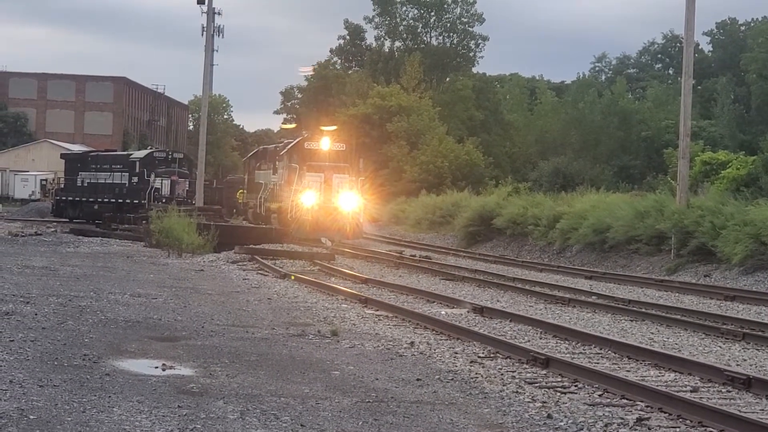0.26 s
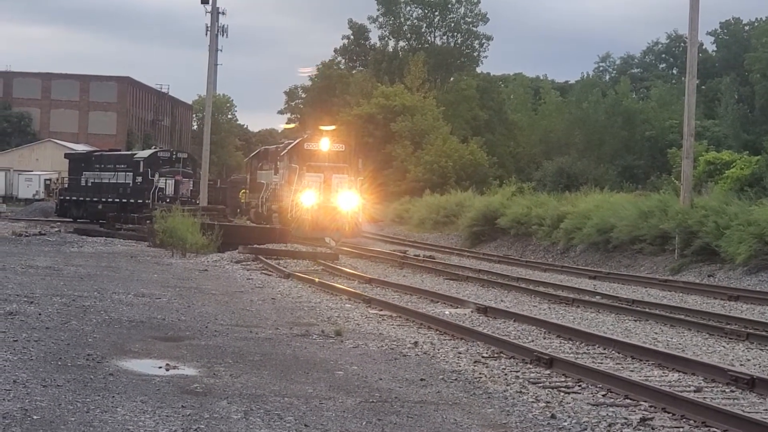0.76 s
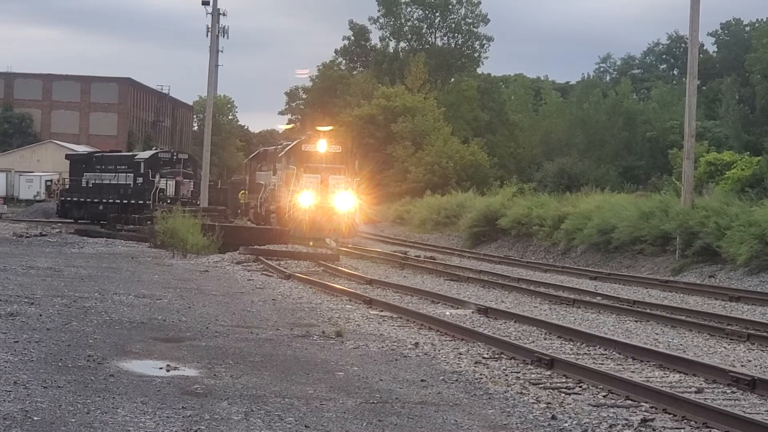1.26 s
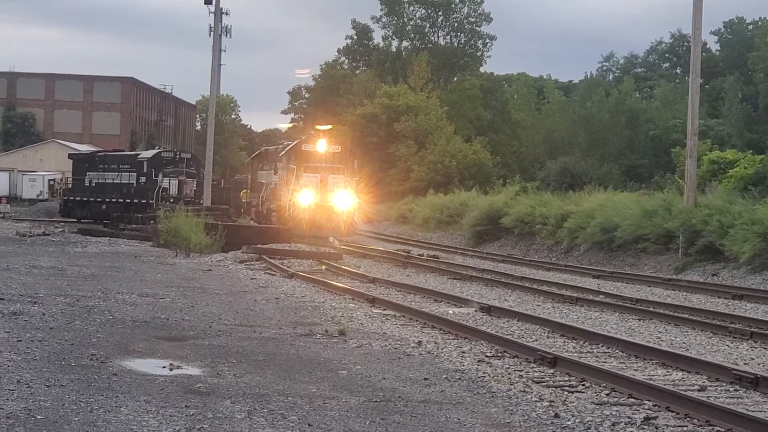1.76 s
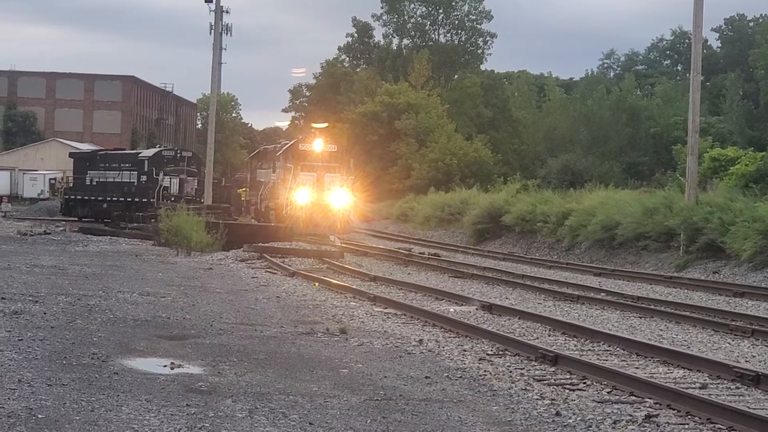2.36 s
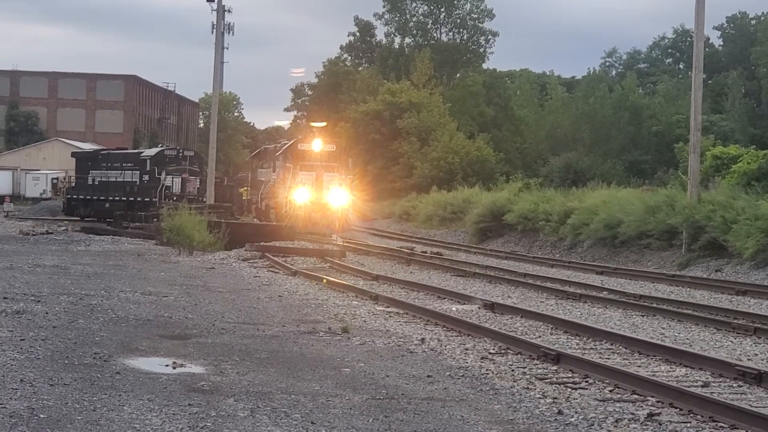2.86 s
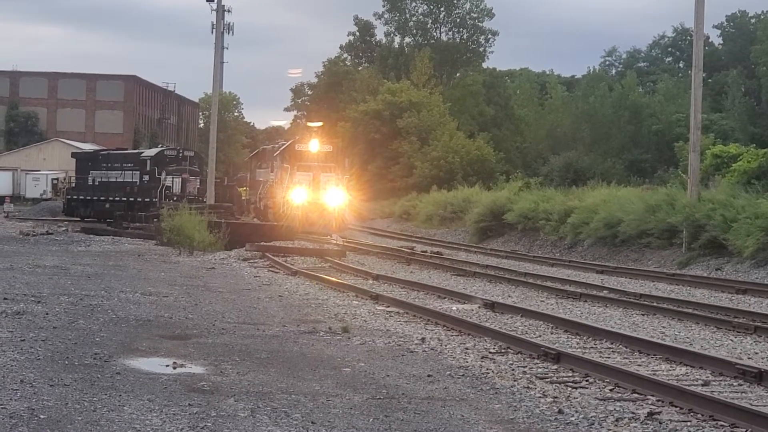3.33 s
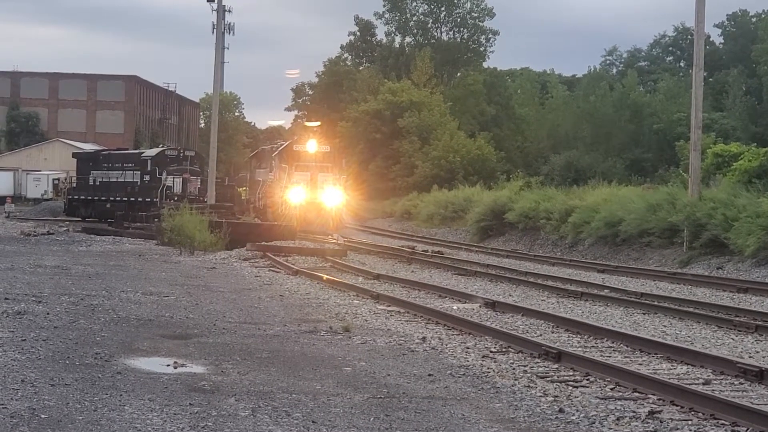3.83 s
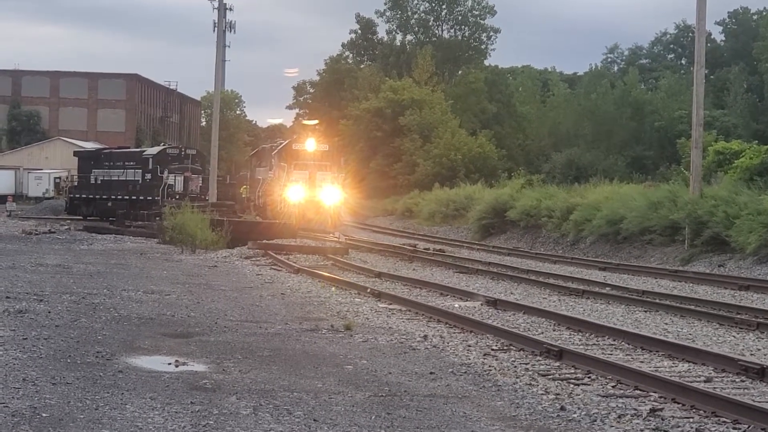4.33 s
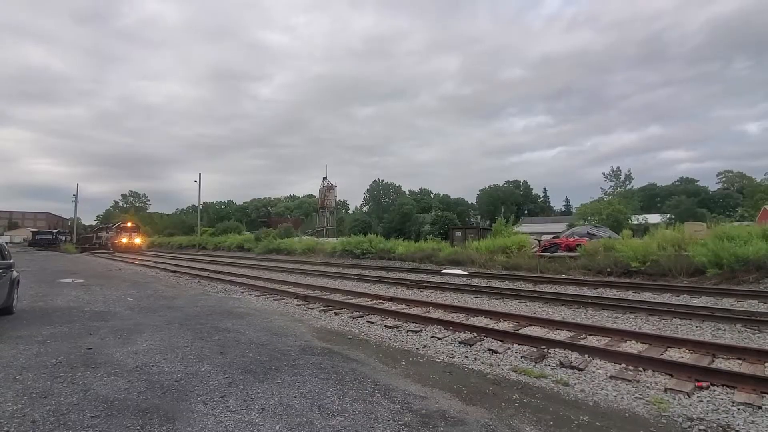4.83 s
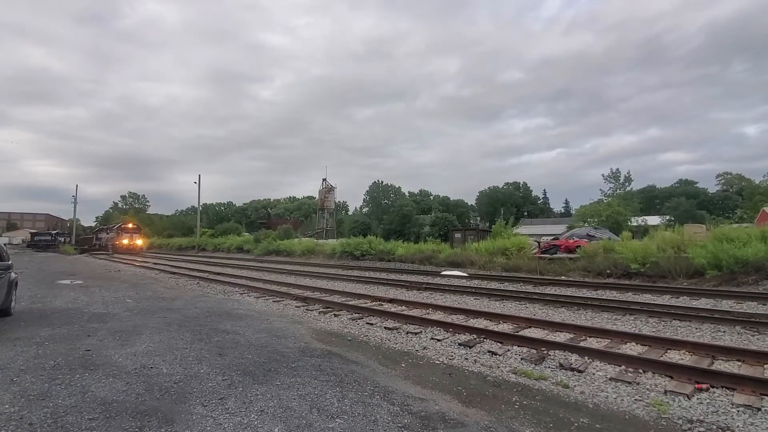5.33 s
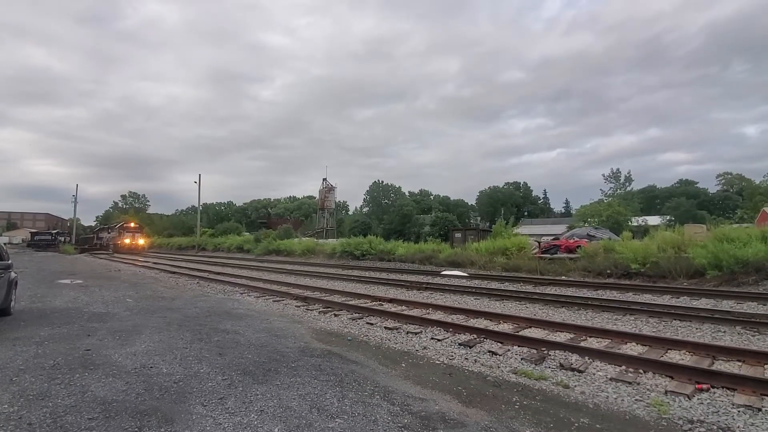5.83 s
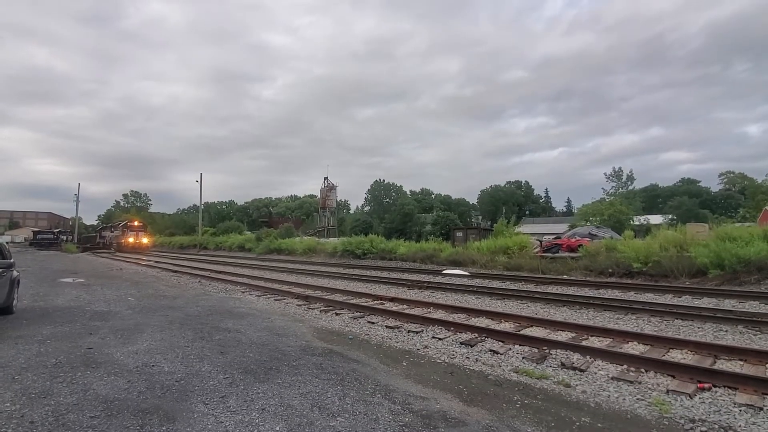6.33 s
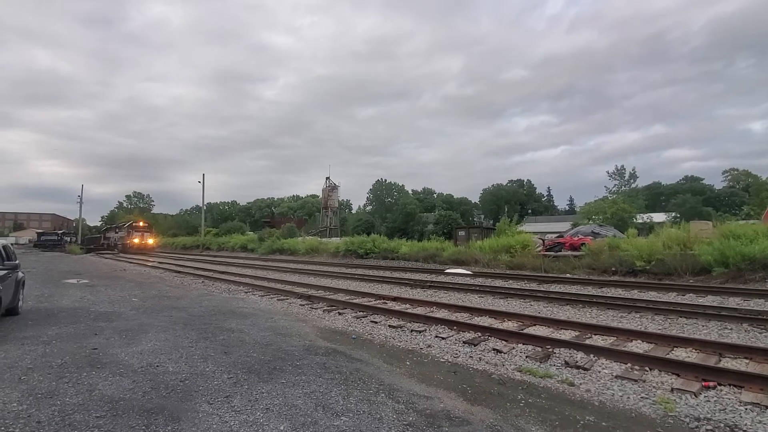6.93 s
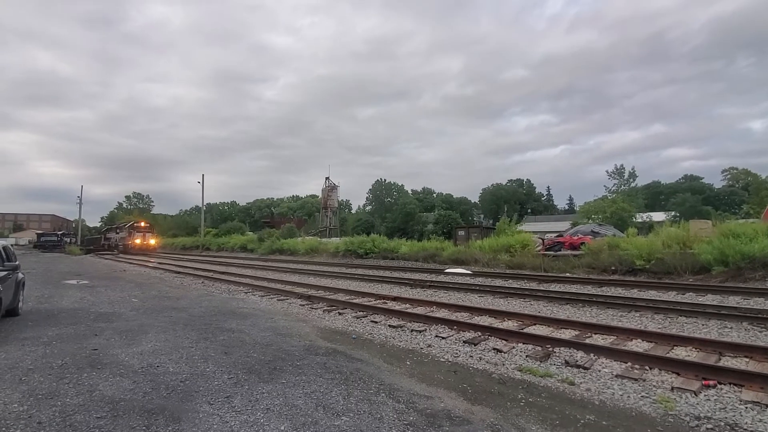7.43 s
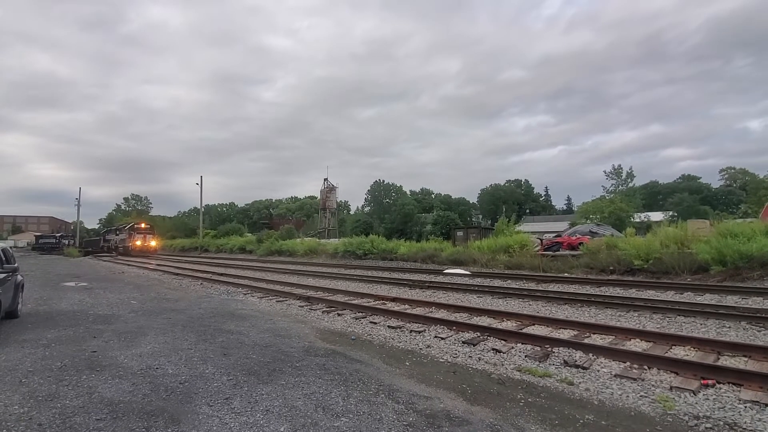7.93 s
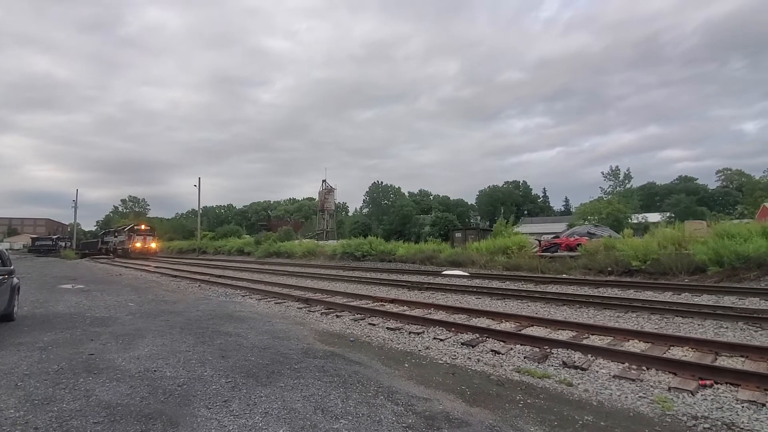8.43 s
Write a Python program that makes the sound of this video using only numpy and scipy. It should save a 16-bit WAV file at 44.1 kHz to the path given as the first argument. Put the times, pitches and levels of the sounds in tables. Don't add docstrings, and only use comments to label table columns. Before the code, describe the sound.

Outdoors in a rail yard, a handheld phone picks up a big diesel locomotive idling in a deep, wavering drone. Insects rasp in the weeds over a soft hiss. Near one second a coupler thuds with thin brake squeals, followed by a sharp air puff. After a blunt handling knock, the sound cuts at about 4.7 seconds to a louder, rougher engine, with small knocks and crisp gravel cracks.

```python
import sys
import numpy as np
from scipy import signal
from scipy.fft import rfft, irfft, next_fast_len
from scipy.io import wavfile
from scipy.ndimage import uniform_filter1d

SR = 44100
rng = np.random.default_rng(int(sys.argv[2]) if len(sys.argv) > 2 else 0)


def undo_db(level):
    steps = np.asarray(level, float) / 20
    return 10 ** steps


def pcm_store(signal):
    levels = np.round(np.clip(np.atleast_2d(signal), -1, 1) * 32767)
    wavfile.write(sys.argv[1], SR, levels.astype(np.int16).T)


N = 382788
T = np.arange(N) / SR
SIZE = next_fast_len(N)
HZ = np.arange(SIZE // 2 + 1) * SR / SIZE + 1e-3
EARS = np.array([[1], [-1]]) / 2
CUT_S = 4.73399

# hz, left_db_per_hz, right_db_per_hz
YARD_HISS = [
    [(2400, -104, -109), (2700, -108, -110), (3300, -107, -109), (3900, -109, -110), (4520, -107, -108), (4870, -100, -103), (6070, -101, -118), (6630, -114, -112), (7160, -116, -115), (9580, -101, -102), (10440, -105, -92.5), (12400, -114, -105), (15500, -120, -112), (15200, -121, -136), (15800, -125, -138)],
    [(2650, -101, -105), (3500, -96.5, -107), (3800, -102, -103), (4140, -97.5, -96.5), (4550, -102, -102), (5420, -102, -102), (5900, -105, -119), (6750, -112, -118), (7750, -118, -121), (8130, -106, -119), (8460, -102, -119), (9000, -98.5, -109), (10000, -103, -104), (11270, -102, -95), (12500, -110, -96), (13300, -115, -101), (14300, -118, -100), (15600, -120, -106), (15800, -125, -115)],
]
# time_s, level_db
FAR_CHORUS = [(0, 3.5), (.7, 1), (1.3, 0.5), (2.3, 0.5), (2.6, 4), (4.5, 2.5), (4.72, 1)]


def along(table):
    rows = np.array(table)
    return [np.interp(T, rows[:, 0], column) for column in rows.T[1:]]


def over_hz(table):
    rows = np.array(table)
    return np.array([np.interp(np.log(HZ), np.log(rows[:, 0]), column) for column in rows.T[1:]])


def filtered(x, gain):
    return irfft(rfft(x, SIZE) * gain, SIZE)[..., :N]


def above(hz, steep):
    return 1 / (1 + (hz / HZ) ** steep)


def walk(rate_hz):
    hold = int(SR / rate_hz)
    held = np.repeat(rng.standard_normal(N // hold + 1), hold)
    return 1.255 * uniform_filter1d(uniform_filter1d(held, hold), hold)[:N]


def humps(table):
    return sum(db * np.clip(1 - np.abs(T - s) / half, 0, 1) for s, half, db in table)


def ports(stand):
    # hz, share
    alike = [(150, 1), (300, 0.93), (450, 0.89), (700, 0.83), (1000, 0.62), (2000, 0.5), (4000, 0.28),
             (8000, 0.3), (12000, 0.26)]
    # hz, lead_rad
    lead = [
        [(0, 0), (100, -.1), (520, .6), (750, .3), (1400, 2.1), (2000, 2.), (3200, 8.8), (16000, 45)],
        [(0, 0), (100, 0), (350, .5), (450, 1.9), (620, .8), (800, 1.1), (900, 1.9), (2200, 6.3), (4800, 15.3), (16000, 44)],
    ]
    shared, left, right = rfft(rng.standard_normal((3, SIZE)))
    like = np.clip(over_hz(alike)[0], 0, 1)
    late = shared * np.exp(-1j * np.interp(HZ, *np.transpose(lead[stand])))
    return np.sqrt(like) * np.array([shared, late]) + np.sqrt(1 - like) * np.array([left, right])


def banded(noise, edges_hz, levels_db, colour):
    steps = [1] + [above(hz, 2.3 + hz / 500) for hz in edges_hz] + [0]
    bands = 0
    for db, lower, upper in zip(levels_db, steps, steps[1:]):
        bands = bands + undo_db(db) * irfft(noise * (lower - upper), SIZE)[:, :N]
    return filtered(bands, undo_db(over_hz(colour)) * np.sqrt(SR / 2))


def strokes():
    # start_s, peak_db
    wing_strokes = [(0.0902, -54), (0.1471, -51), (0.1955, -55), (0.2433, -47), (0.2862, -50),
                    (0.3287, -56), (0.3755, -52), (0.5222, -44), (0.5621, -48), (0.6325, -49),
                    (0.9093, -53), (1.3882, -50), (1.4277, -45.5), (1.5723, -52), (1.9405, -58),
                    (1.9874, -52), (2.2009, -58), (2.3526, -52), (2.3979, -47.5), (2.4364, -51),
                    (2.4763, -55), (2.5142, -53), (2.5601, -52), (2.6095, -46), (2.6584, -47),
                    (2.6988, -42.5), (2.8569, -51), (2.9542, -53), (3.0021, -45.5), (3.041, -49),
                    (3.0804, -48), (3.1288, -50), (3.2186, -52), (3.269, -51), (3.3258, -53),
                    (3.3737, -48.5), (3.4077, -49), (3.461, -47), (3.4974, -54), (3.5458, -53),
                    (3.5957, -54), (3.6441, -50), (3.697, -46), (3.7434, -44), (3.7818, -48), (3.8511, -48),
                    (3.897, -50), (3.9404, -54), (3.9898, -51), (4.0342, -48), (4.115, -49), (4.1584, -52),
                    (4.3056, -49), (4.3829, -51), (4.4662, -54), (4.5121, -55), (4.5605, -48),
                    (4.6084, -53), (4.6438, -48.5), (4.6843, -52)]
    stroke_s = 0.044
    when_s, size_db = np.transpose(wing_strokes)
    steady_s = np.arange(0, CUT_S, stroke_s)
    gap_s = np.abs(steady_s[:, None] - when_s).min(axis=1)
    lull_s = steady_s[gap_s > 0.8 * stroke_s]
    at = (when_s * SR).astype(int)
    hits = np.zeros(N)
    hits[(lull_s * SR).astype(int)] = undo_db(-60 + 61.0)
    hits[at] = undo_db(size_db - along(FAR_CHORUS)[0][at] + 57.5)
    t = T[:SR // 10]
    return signal.fftconvolve(hits, (1 - np.exp(-t / 0.0016)) * np.exp(-t / 0.017))[:N]


def yard(stand):
    # centre_s, half_length_s, lift_db
    gusts = [
        (1.043, 0.23, 6.5),
        (4.43, 0.34, 4.5),
        (6.17, 0.35, 2.5),
        (6.717, 0.25, 4.5),
        (7.96, 0.23, 4.5),
        (4.95, .4, -3),
        (8.62, 0.15, 2.5),
    ]
    top_share = 0.37
    gust_db = humps(gusts)
    if stand == 0:
        chorus_db = along(FAR_CHORUS)[0]
        settle_db = -0.32 * (T - 3.0)
        rasp = strokes()
        treble_share = top_share
    else:
        chorus_db = 1.5 * (T - 5.2)
        settle_db = -0.3
        rasp = 0.45 * undo_db(3.5 * walk(40))
        treble_share = 1.1
    middle_db = gust_db + settle_db
    high_db = chorus_db + 0.43 * gust_db

    def rasp_db(share):
        return 10 * np.log10(0.5 + (share * rasp) ** 2)

    swell_db = 1.0 * walk(8.4)
    shrill_gate = np.clip((6.8 - T) / 0.5, 0, 1) * np.clip((T - 4.3) / 1.3, 0, 1)
    shrill_db = stand * 5 * (shrill_gate - 0.4)
    flicker_db = 1.3 * walk(17)
    levels_db = (
        middle_db + flicker_db + 1.0 * walk(3.04),
        middle_db - 0.39 * gust_db + 2.15 + rasp_db(1.0),
        high_db + swell_db + rasp_db(1.13),
        treble_share * high_db - stand * 1.5 + swell_db + 0.62 * walk(17) + rasp_db(0.28),
        top_share * high_db + shrill_db + swell_db + 1.5 * walk(17) + rasp_db(0.28))
    hiss = banded(ports(stand), (4670, 8870, 12000, 13100), levels_db, YARD_HISS[stand])
    return filtered(hiss, above(2490, 41))


def jets(table, width_share, pure):
    out = np.zeros((2, N))
    for s, length_s, hz, db, pan_db in table:
        t = T[:int(length_s * SR)]
        low_pass = signal.butter(2, width_share * hz / 2, fs=SR, output="sos")
        slow = signal.sosfilt(low_pass, rng.standard_normal((4, SR // 2)))
        in_phase, quadrature = slow[:2, -len(t):], slow[2:, -len(t):]
        phase = 2 * np.pi * hz * t * (1 + 0.14 * t / 2)
        jet = (in_phase + pure * slow.std()) * np.cos(phase) + quadrature * np.sin(phase)
        jet = jet * undo_db(2.5 * walk(30)[:len(t)])
        shape = np.minimum(t / 0.01, 1) * (1 - t / length_s) ** 0.17
        at = int(s * SR)
        out[:, at:at + len(t)] += undo_db(db + pan_db * EARS) * shape * jet / jet.std()
    return out


def squeals():
    # start_s, length_s, centre_hz, level_db, left_minus_right_db
    brake_squeals = [
        (.923, .25, 4200, -71, -6),
        (.936, .06, 3530, -74, 8),
        (1.051, .11, 3530, -75, 8),
        (.961, .09, 3310, -72, 10),
        (.936, .045, 2510, -71, 11),
        (1.086, .04, 2510, -73, 11),
        (.941, .03, 6060, -75, 0),
        (4.181, .07, 3340, -76, 3),
        (4.276, .125, 3440, -74, 3),
        (4.301, .09, 3090, -80, 8),
    ]
    return jets(brake_squeals, 0.03, 1.0)


def whistles():
    # start_s, length_s, centre_hz, level_db, left_minus_right_db
    valve_whistles = [
        (4.205, .03, 3400, -77, 3),
        (5.970, 0.043, 4170, -75, 2),
        (1.424, .022, 5050, -66, 2),
        (1.380, .02, 4950, -69, 2),
        (8.518, .09, 4100, -66, -2),
        (8.521, 0.04, 4850, -71, -2),
        (8.52, .05, 3450, -72, -2),
        (8.585, .04, 4900, -74, -2),
        (1.09, .07, 5000, -75, 0),
    ]
    return jets(valve_whistles, 0.1, 0)


def puffs():
    # start_s, length_s, centre_hz, level_db, left_minus_right_db
    air_puffs = [(.927, 0.25, 10000, -65, 4), (.928, 0.23, 3800, -75, -1), (4.148, .45, 3300, -76, 3),
                 (1.382, 0.11, 1790, -61.5, 1), (1.422, 0.033, 852, -46.5, -4),
                 (1.423, 0.028, 5150, -65, 0), (5.389, 0.031, 1620, -54, -16),
                 (5.387, 0.037, 3200, -65, -10), (5.388, 0.026, 6500, -71, -13),
                 (6.198, 0.13, 4230, -69, -9), (8.526, 0.083, 4290, -68, 3)]
    return jets(air_puffs, 0.6, 0)


def gravel():
    # start_s, rms_level_db, length_s, left_minus_right_db, lowest_hz
    cracks = [(0.091, -46, 0.0024, 11, 8000), (5.513, -48, 0.013, 2, 8000), (5.667, -55, 0.034, -5, 8000),
              (6.661, -35.5, 0.0034, 3, 8000), (6.666, -48, .005, -5, 9000), (6.636, -49, .02, -7, 10500),
              (6.68, -48, .035, -7, 10500), (7.977, -50, .003, -5, 10000), (6.69, -52, 0.084, -7, 9050),
              (7.225, -56, .008, 0, 9000), (7.267, -38, 0.0056, -7, 13000), (7.276, -41, .007, -7, 12000),
              (7.31, -53, 0.035, 12, 3530), (7.308, -43.5, 0.013, 13, 5000), (7.314, -38, .026, -4, 12800),
              (7.27, -55, 0.048, 10, 4800), (7.308, -44, 0.061, -0.5, 9000), (7.313, -37, .004, -3, 9000),
              (7.324, -44, .006, -2, 11500), (7.331, -37, .005, 1, 9500), (7.336, -44, .004, -3, 8500),
              (7.77, -52, .006, 2, 8000), (7.7925, -29.5, 0.003, -5, 10400), (7.853, -47, .006, 2, 3500),
              (7.872, -57, .03, -5.5, 8000), (7.943, -53, .018, -4, 10000),
              (7.971, -38.5, 0.0038, -3, 2500), (8.197, -54, .006, 0, 8000)]
    out = np.zeros((2, N))
    for s, db, length_s, pan_db, low_hz in cracks:
        n = int(length_s * SR)
        chance = rng.random((2, 4000))[:, :n]
        grains = (chance[0] < 0.012) * undo_db(-4.5 * np.log(chance[1]))
        rough = 1.1 + signal.lfilter([1], [1, -0.96], grains)
        shape = np.sin(np.pi * (np.arange(n) / n) ** 0.39)
        swarm = rng.standard_normal(4000)[:n] * rough * shape
        swarm = signal.sosfilt(signal.butter(4, low_hz, "high", fs=SR, output="sos"), swarm)
        at = int(s * SR)
        out[:, at:at + n] += undo_db(db + pan_db * EARS) * swarm / np.sqrt(np.mean(swarm ** 2))
    port_colour = undo_db(0.75 * (over_hz(YARD_HISS[1]) + 91.5))
    return filtered(out, port_colour * above(1800, 11) * (1 - above(15900, 13)))


def knocks():
    # start_s, ring_hz, t60_s, left_db, right_db
    rings = [(.926, 128, .3, -21, -21), (.942, 95, .22, -24, -24), (.940, 282, .16, -30, -30),
             (.995, 300, .2, -35, -35), (1.428, 830, .1, -42, -42), (1.432, 1600, .08, -54, -54),
             (4.60984, 1085, .0053, -70, -19.7), (4.6098, 2500, .009, -70, -45),
             (4.6098, 1600, .008, -70, -38), (5.392, 1300, .08, -47, -38), (5.397, 1600, .05, -50, -40),
             (5.396, 1850, .06, -50, -41), (5.396, 2150, .04, -54, -45), (5.395, 2450, .03, -60, -50),
             (7.637, 1650, .035, -42, -40)]
    out = np.zeros((2, N))
    t = T[:SR // 3]
    for s, hz, t60_s, left_db, right_db in rings:
        ring = -np.sin(2 * np.pi * hz * t) * np.exp(-np.log(1000) * t / t60_s)
        at = int(s * SR)
        out[:, at:at + len(t)] += undo_db(np.array([[left_db], [right_db]])) * ring
    return out


def finger():
    rest_hz, extra_turns, relax_s = 56.8, 1.006, 0.00173
    t = np.maximum(T - 4.60952, 0)
    closing = 1 - np.exp(-(t / 0.00218) ** 2.53)
    size = closing * (8 * np.exp(-t / 0.00092) + 0.44 * np.exp(-t / 0.0119))
    turns = rest_hz * t + extra_turns * (1 - np.exp(-t / relax_s))
    return np.array([[0], [-1]]) * size * np.sin(2 * np.pi * turns)


def locomotive(stand):
    # multiple, first_stand_db, second_stand_db
    orders = [(7, -57, -50), (8, -44, -36), (9, -44, -43), (11, -47, -42), (12, -46, -45), (13, -56, -39),
              (16, -40, -35), (17, -54, -45), (20, -56, -47), (24, -50, -48), (28, -58, -46),
              (32, -58, -45), (33, -56, -45), (34, -57, -50), (39, -60, -49), (40, -52, -41.5),
              (41, -62, -54), (42, -64, -54), (48, -62, -58), (54, -66, -55), (63, -68, -56),
              (155, -75, -61)]
    # multiple, centre_s, half_length_s, lift_db
    beats = [(16, .5, .7, 5), (16, 1.45, .3, 6), (16, 2.8, .7, -6), (16, 4.4, .3, 5), (24, 2.0, .2, 7),
             (24, 3.15, .3, 6), (12, 2.75, .25, 7), (16, 5.3, .5, -6), (16, 6.1, .25, 5),
             (16, 6.47, .2, -10), (16, 6.85, .3, 5), (16, 7.25, .22, -9), (16, 7.65, .3, 4),
             (16, 8.15, .25, -10), (16, 8.55, .25, 6), (13, 6.8, .3, 10), (13, 7.85, .35, 7),
             (13, 8.42, .15, 7), (13, 7.3, .2, -5), (8, 6.05, .4, 4), (8, 6.6, .2, -10), (8, 7.25, .2, 5),
             (8, 7.8, .3, -11), (8, 8.55, .2, 5), (11, 5.0, .2, 7), (11, 8.35, .25, 8), (33, 6.15, .15, 7),
             (33, 6.5, .12, 7), (33, 7.1, .12, 7), (33, 7.65, .25, 6), (33, 8.45, .2, 5),
             (40, 8.45, .12, 6), (40, 6.65, .15, -6), (40, 8.1, .15, -6), (28, 7.1, .15, 7),
             (20, 7.75, .4, 5), (20, 6.1, .2, 7), (40, 6.2, .1, 4), (40, 7.7, .15, 3)]
    # time_s, level_db
    effort = [
        [(0, -36.5), (.3, -32.5), (.75, -34), (1.0, -32.5), (1.3, -35), (2.9, -37.5), (3.6, -35), (4.25, -36.5),
         (4.72, -36)],
        [(4.75, -31), (5.25, -32.5), (6.2, -29.5), (6.55, -29.5), (6.8, -29), (7.3, -29), (7.8, -28.5),
         (8.3, -28.5), (8.68, -27.5)],
    ]
    # hz, left_db_per_hz, right_db_per_hz
    rumble_colour = [
        [(20, -63, -69), (45.6, -54, -54), (78.5, -54.5, -52.5), (100.5, -58, -60), (188, -64, -62), (422, -75, -74), (523, -81.5, -78.5), (596, -74, -76), (1024, -86.5, -83), (1570, -93, -87.5), (1850, -90.5, -86.5), (2470, -102, -106), (2650, -102, -109)],
        [(20, -59, -67), (42.2, -49.5, -50), (86.5, -52, -51), (153, -60, -58), (215, -64.5, -60), (240, -63, -60.5), (395, -75, -66), (513, -66, -72), (758, -76.5, -71.5), (1016, -89, -81.5), (1250, -82, -78.5), (1525, -91.5, -84.5), (2217, -89, -86), (2500, -101, -104)],
    ]
    # centre_s, half_length_s, lift_db
    surges = [(.26, .08, 1), (.56, 0.088, 2.5), (1.03, 0.11, 0), (1.43, 0.066, 1), (1.72, 0.076, 1),
              (2.04, .07, 1.5), (2.41, 0.064, 1), (2.71, 0.083, 3), (3.06, 0.13, 2), (3.44, 0.1, 1.5),
              (3.78, 0.11, 5), (4.08, 0.14, 3), (4.33, 0.15, 2.5), (5.12, 0.18, 1.5), (6.22, 0.095, 2.5),
              (6.75, 0.09, 2.5)]
    crank_hz = (5.19, 5.28)[stand]
    turn = 2 * np.pi * np.cumsum(crank_hz * (1 + 0.0015 * walk(1.5))) / SR
    boom_db = along(effort[stand])[0] - np.mean(effort[stand], axis=0)[1]
    growl_db, roar_db = 0.86 * boom_db, 0.56 * boom_db

    drone = 0
    for row, start in zip(orders, rng.uniform(0, 2 * np.pi, len(orders))):
        multiple = row[0]
        effort_db = boom_db if multiple * crank_hz < 110 else growl_db
        beat_db = humps([beat[1:] for beat in beats if beat[0] == multiple])
        order_db = row[1 + stand] + 3 + effort_db + beat_db + 1.5 * walk(4)
        drone = drone + undo_db(order_db) * np.sin(multiple * turn + start)

    throb_db = 0.26 * np.sin(turn) + 0.52 * np.sin(4 * turn) + 0.76 * np.sin(8 * turn) + 0.99 * np.sin(16 * turn)
    surge_db = humps(surges) - 0.8
    levels_db = [boom_db + 0.51 * throb_db, growl_db + throb_db + 1.76 * walk(25)]
    for surge_share in (0.92, 1, 1.8):
        levels_db.append(roar_db + surge_share * surge_db + 0.1 * throb_db + 1.02 * walk(18))
    back = 0.4 * (1 - above(404, 6.2))
    comb = np.sqrt(1 - back ** 2) / (1 - back * np.exp(-2j * np.pi * HZ / crank_hz))
    rumble = banded(ports(stand) * comb, (110, 400, 800, 2100), levels_db, rumble_colour[stand])
    bass_cut = above(23, 14) * (0.38 + 0.67 * above(38.4, 12))
    return filtered(rumble, (1 - above(2675, 57)) * bass_cut) + drone


def scene():
    first, second = (yard(stand) + locomotive(stand) for stand in range(2))
    vent = signal.butter(2, 22, "high", fs=SR, output="sos")
    touches = signal.sosfilt(vent, knocks() + finger())
    cut = int(CUT_S * SR)
    jump = np.array((-0.081, -0.11)) - second[:, cut] + first[:, cut - 1]
    settle = jump[:, None] * np.exp(-np.maximum(T - CUT_S, 0) / 0.0047)
    stands = np.where(np.arange(N) < cut, first, second + settle)
    return stands + gravel() + puffs() + whistles() + squeals() + touches


def top_cut(x):
    return signal.sosfilt(signal.butter(12, 16510, fs=SR, output="sos"), x)


def record(dry):
    # hz, level_db_per_hz
    faint = [(2000, -116), (3400, -114), (5000, -116), (5900, -118), (6900, -121), (7700, -120),
             (12000, -120), (15000, -125)]
    top_hz = 15790
    padded = np.pad(dry, ((0, 0), (0, 4096)), "reflect")
    hz, _, cells = signal.stft(padded, SR, nperseg=2048, scaling="psd")
    power = 2 * np.abs(cells) ** 2
    patch = uniform_filter1d(power, size=9, axis=1)
    waver_db = 1.2 * np.repeat(rng.standard_normal((2, 103, cells.shape[2])), 10, axis=1)[:, :len(hz)]
    limit_db = np.interp(hz, *np.transpose(faint), left=-200)[:, None] + waver_db
    strong = (power > 0.6 * patch) | (hz[:, None] < 900)
    click = power[:, hz > top_hz].mean(axis=1, keepdims=True) > undo_db(2 * -96)
    keep = (patch > undo_db(2 * limit_db)) & strong & ((hz[:, None] < top_hz) | click)
    thinned = signal.istft(cells * keep, SR, nperseg=2048, scaling="psd")[1][:, :N]
    return top_cut(thinned)


dry = scene()
out = record(dry)
pcm_store(out)
```